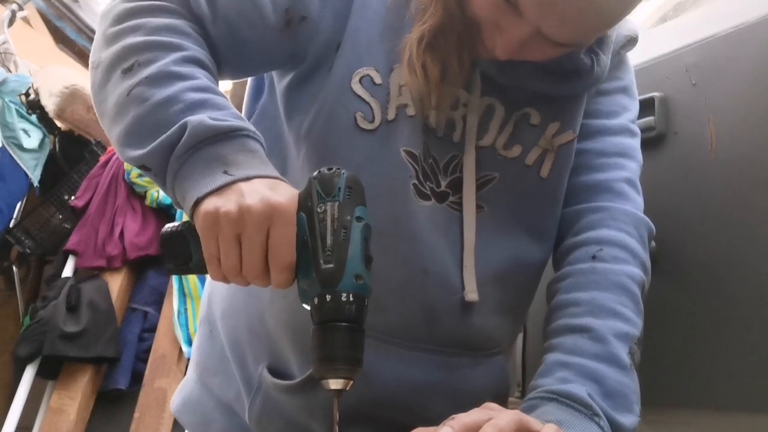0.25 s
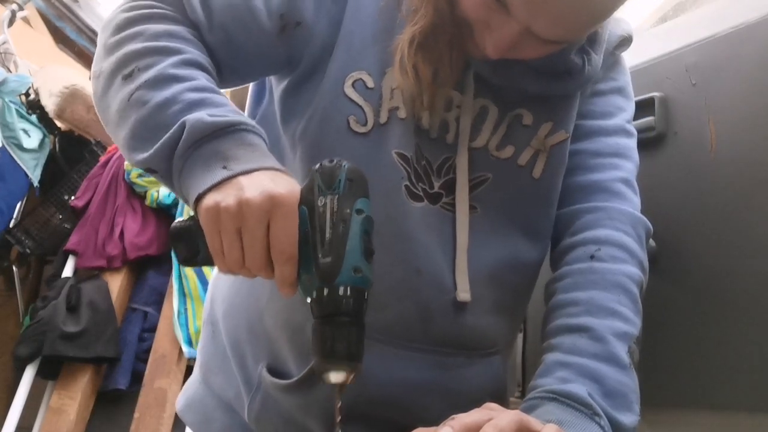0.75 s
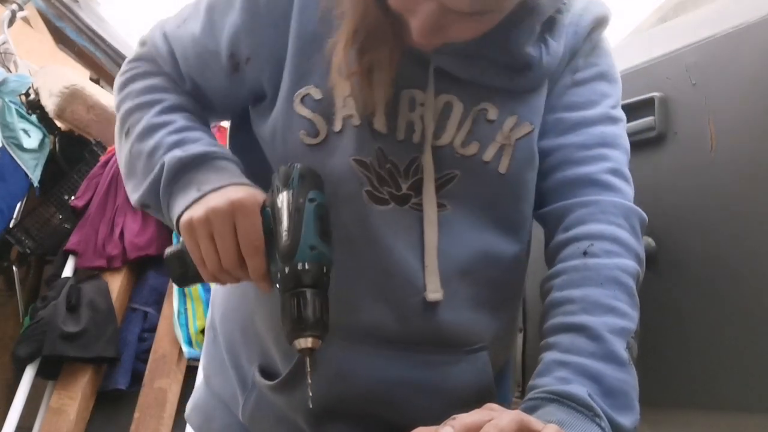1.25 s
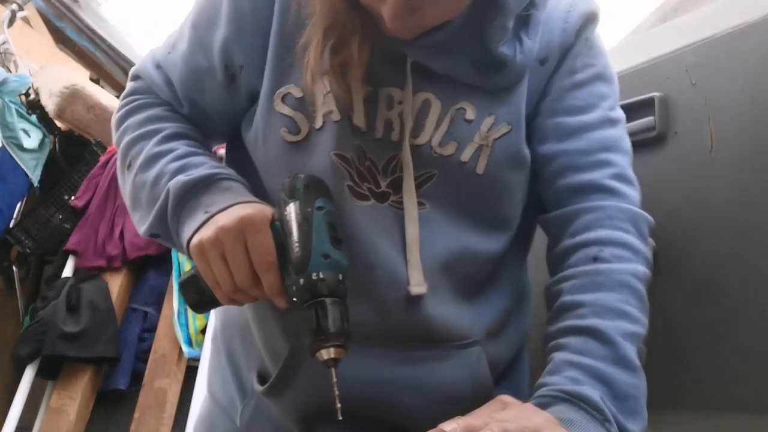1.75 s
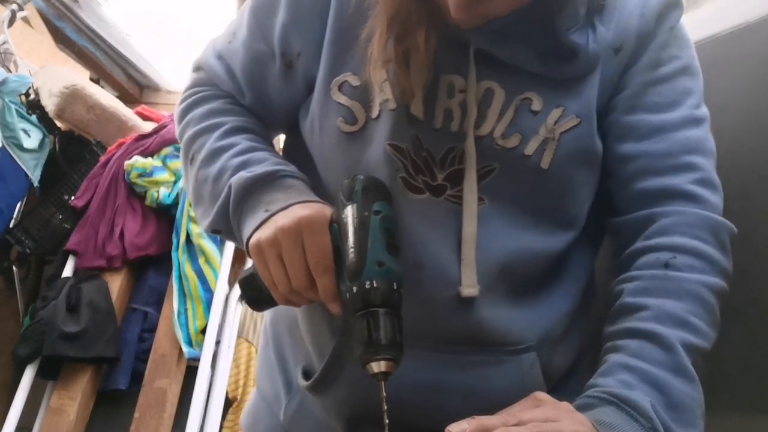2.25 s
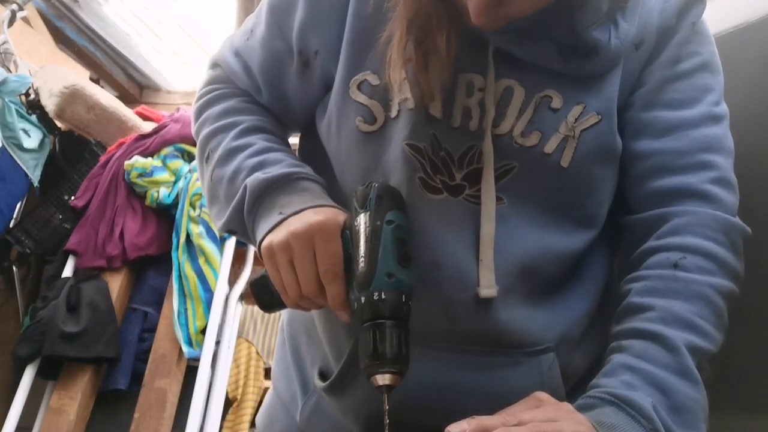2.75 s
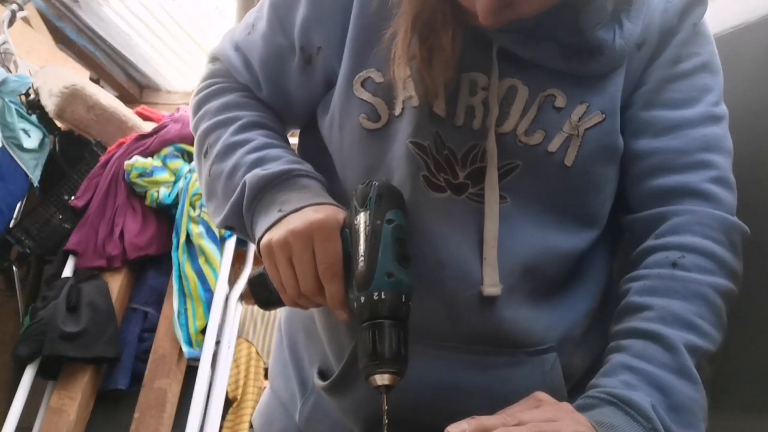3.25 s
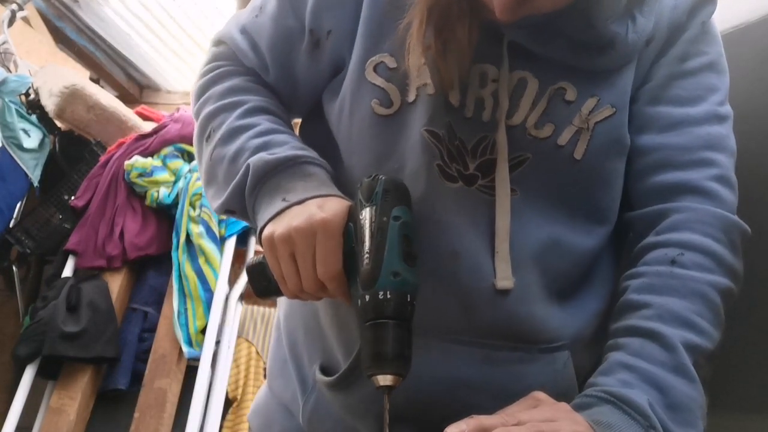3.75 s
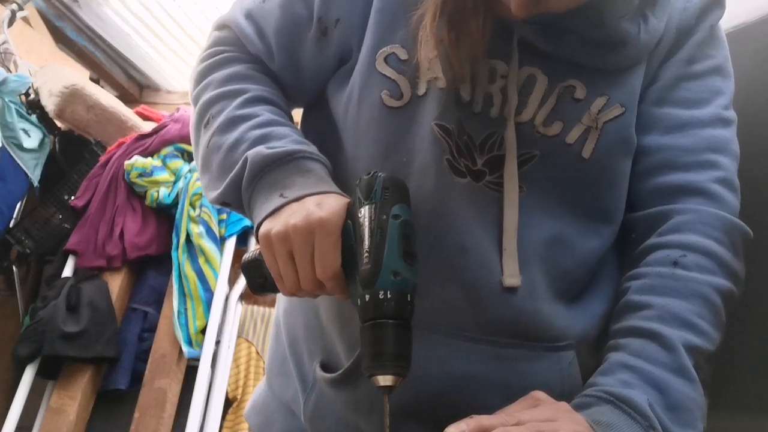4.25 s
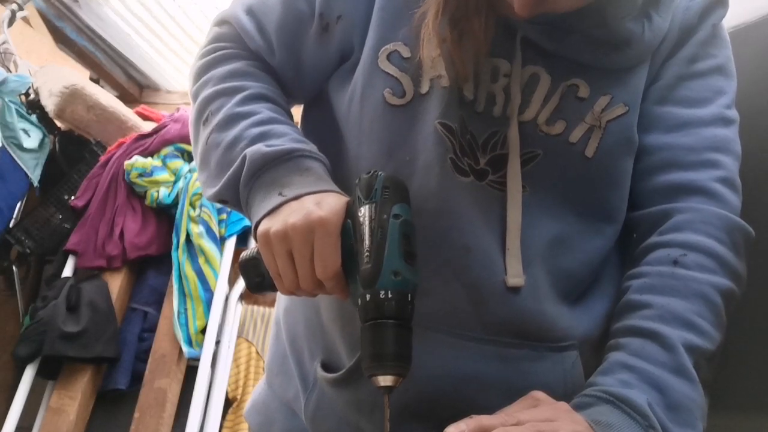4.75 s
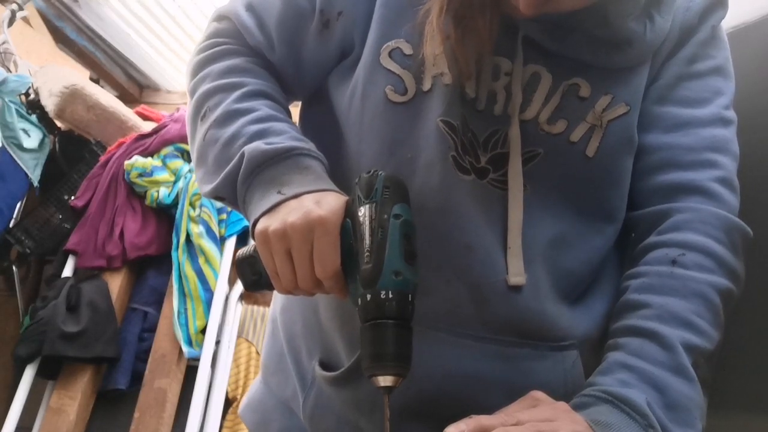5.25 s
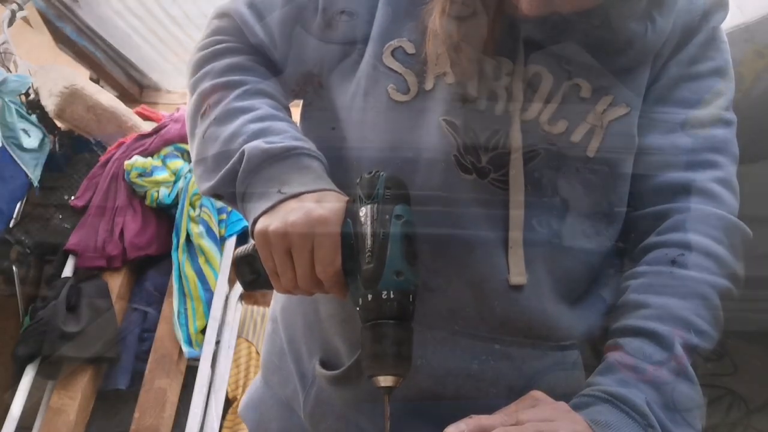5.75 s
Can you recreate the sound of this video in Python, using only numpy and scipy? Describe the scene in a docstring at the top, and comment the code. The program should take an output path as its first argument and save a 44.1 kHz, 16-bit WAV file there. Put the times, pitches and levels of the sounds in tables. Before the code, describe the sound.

Three short bursts of a cordless drill, a few taps, then steady drilling into sheet steel, chattering and squealing over a faint distant engine.

```python
"""A cordless drill is blipped three times in a hole in a steel panel, which rumbles under the bit.
It is lifted and set down with a few ticks. Then it bores the next hole: the motor whines, the bit
grabs and slips in a fast chatter, then cuts with a thin squeal. A distant engine drones outside the
garage throughout. All this is in the right channel; at the end a soft rush swells on both sides."""
import sys
import numpy as np
from scipy import signal
from scipy.io import wavfile

SR = 44100
rng = np.random.default_rng(int(sys.argv[2]) if len(sys.argv) > 2 else 0)


def log_audio(samples):
    """Write samples as a 16-bit WAV file to the path given in sys.argv[1]."""
    # one column per channel
    frames = np.atleast_2d(samples).T
    # limit to full scale, then quantise
    limited = np.clip(frames, -1, 1)
    pcm = np.round(limited * 32767).astype(np.int16)
    wavfile.write(sys.argv[1], SR, pcm)


N = 265482

# Short pulls of the trigger. Each row: press and release in seconds, top speed in turns per second,
# coasting time in seconds, fade in dB per second, relative levels of hiss, gear rattle and panel rumble
# in dB, and the second at which the bit leaves the rim.
BLIPS = [(0.037, .256, 297, 0.083, 750, -47, -46, -39, 0.24),
         (0.334, 0.566, 292, 0.086, 560, -47, -45, -34.5, 0.55),
         (0.668, 0.898, 305, .42, 400, -46, -47, -35.5, 0.81)]
# The motor sags as the bit digs in. Each row: time in seconds, top speed in turns per second.
BORE_SPEED = [(3.8, 277), (4.0, 277), (4.22, 285), (4.55, 274), (4.95, 264), (6.02, 266)]
# Gear whine while boring. Each row: time in seconds, relative level in dB.
BORE_WHINE = [(3.85, -70), (3.93, -58.5), (4.1, -49.5), (4.3, -48), (4.65, -55.5), (4.97, -54),
              (5.15, -62.5), (5.7, -62.5), (6.02, -69)]
# Tones of the cooling fan. Each row: multiple of the motor speed, relative level in dB.
FAN_TONES = [(14, -22), (21, -17), (28, -24)]
# How fast the bit chatters. Each row: time in seconds, slips per second.
CHATTER_RATE = [(3.9, 279), (4.0, 287), (4.85, 290), (5.03, 277), (5.5, 281)]
# Tones of the chatter. Each row: multiple of the chatter rate, relative level in dB.
CHATTER_TONES = [(2, -1), (4.05, -7), (5, -5), (6, -2.5), (7, -4.5), (8.3, -14), (10, -14.5)]
# Thin squeals and high motor overtones.
# Each row: start and end in seconds, pitch and width in Hz, relative level in dB.
SQUEALS = [(.108, .135, 14100, 900, -47), (.195, 0.21, 14800, 1200, -48), (0.498, 0.549, 14500, 1400, -48),
           (4.25, 4.54, 8260, 44.7, -55.5), (4.62, 4.9, 4890, 50, -57), (4.876, 5.158, 4890, 35.7, -51),
           (4.653, 4.88, 7540, 109.9, -54.5), (4.7, 5.4, 5240, 50, -60), (5.1, 5.583, 7490, 90, -55.5),
           (5.118, 5.55, 7700, 80, -65), (5.15, 5.51, 2910, 49.9, -58.5), (5.15, 5.495, 2387, 70, -57),
           (5.479, 6.1, 4874, 45, -56.5)]
# Short knocks and clicks: trigger releases, taps on the steel, snapping chips.
# Each row: start in seconds, relative level in dB, brightness in Hz, seconds to fade by 60 dB.
KNOCKS = [(0.259, -53, 7000, 0.019), (0.442, -33, 403, 0.019), (0.501, -37, 900, 0.028),
          (.598, -45, 3700, 0.056), (.678, -52, 2496, 0.057), (0.888, -39.5, 5400, 0.072),
          (1.4226, -68.5, 5900, 0.1), (1.621, -50.5, 1710, 0.055), (2.0077, -56.5, 6100, 0.075),
          (2.163, -51.5, 6170, 0.078), (2.168, -49, 5570, 0.064), (2.202, -53.5, 2710, 0.095),
          (2.499, -65, 4985, 0.038), (3.1556, -67, 4020, 0.042), (3.823, -49, 1600, 0.18),
          (5.071, -42, 12050, 0.073), (5.41, -44.5, 13120, 0.093), (5.665, -42.5, 12060, 0.086)]
# The distant engine. Each row: time in seconds, pitch in Hz, relative level in dB.
ENGINE = [(0.0, 86.4, -49), (0.1, 80, -61), (0.22, 90.5, -53), (0.3, 81.7, -59), (0.55, 66.6, -56),
          (0.74, 67, -59), (0.82, 74.9, -52.5), (1.05, 75.2, -52), (1.26, 66.2, -50), (1.34, 63.6, -63),
          (1.59, 61.0, -52), (1.96, 59.6, -63), (2.08, 55.8, -61.5), (2.45, 55.9, -49), (3.84, 55.6, -59.5),
          (3.96, 66.9, -70), (4.14, 72.43, -54.5), (4.32, 72.4, -55), (4.41, 67.6, -66),
          (4.61, 68.1, -50.5), (4.81, 68.04, -63), (4.86, 66.66, -54), (5.25, 67.0, -46),
          (5.5, 68.2, -59.5), (5.89, 66.4, -53), (6.02, 55.8, -55)]

# The pitches at which things ring. Each row: pitch in Hz, width in Hz, relative level in dB.
BIT_MODES = [(2912, 92, 0), (4000, 180, -1), (4950, 77, 2), (5200, 99, 1.5), (5650, 85, -1.5),
             (6600, 170, -2), (7230, 140, -8), (8490, 130, -1.5), (12560, 200, -24)]   # bit and chuck under the cut
CHATTER_MODES = [(607, 9, 3), (770, 42, -23), (1230, 73, -3), (1360, 130, -11), (1734, 320, -3),
                 (1966, 76, -4)]   # rung by the scrapes of the chatter
PANEL_MODES = [(326, 25, -0.5), (540.4, 21, 2), (846, 56, -3.5)]   # the steel sheet
HOUSING_MODES = [(254, 67, 10.5), (970, 730, 6), (1410, 340, 7.5), (2750, 320, 7), (3170, 210, -1),
                 (8600, 170, -27.5), (15300, 430, -14)]   # chuck and housing when knocked

# The colour of each noise, from low to high. Each row: frequency in Hz, relative strength there in dB.
HISS_COLOUR = [(500, -16), (700, -4.5), (980, -8), (1250, -4.5), (1750, -0.5), (2400, -4.5), (3300, -8.5),
               (3900, -6), (5200, -8), (6600, -8.5), (8800, -7.5), (9700, -15), (12000, -12), (15500, -11)]   # brushes, fan and chips
RATTLE_COLOUR = [(450, -19), (560, -6), (830, -3), (1100, 0), (1500, -3.5), (2100, -1), (2800, -12),
                 (4500, -9), (7000, -20.5)]   # gears and loose bit
RIM_RUMBLE_COLOUR = [(60, -6), (150, -2.5), (190, -4.5), (240, 2), (310, 2), (400, -1), (470, -18),
                     (700, -11.5), (1200, -17.5)]   # the panel during the blips
BORE_RUMBLE_COLOUR = [(70, -2), (150, 6.5), (200, -6), (300, 5), (460, -12), (700, -4), (1100, -1),
                      (2000, -34)]   # the panel while boring
RUSH_COLOUR = [(25, -6), (60, 1.5), (115, -13), (180, -7.5), (300, -17), (550, -22.5), (850, -17.5),
               (2000, -24), (4500, -30), (8000, -38), (15000, -51)]   # the closing rush
AIR_COLOUR = [(100, -27.5), (280, -24.5), (380, -31.5), (650, -29.5), (1200, -28.5), (1900, -32),
              (2500, -37), (4700, -38), (5600, -48.5), (7500, -51), (8700, -47.5), (10000, -57),
              (15800, -61)]   # still air in the garage
OUTSIDE_COLOUR = [(26, -2), (40, 8), (60, 0.5), (85, -4.5), (110, -36)]   # low rumble from outside
LEFT_NOISE_COLOUR = [(25, -2), (60, 1.5), (150, -5), (300, -10), (650, -12), (1100, -18.5), (2200, -19.5),
                     (3500, -25), (5200, -27), (6500, -36), (8300, -40), (10800, -25.5), (13000, -27),
                     (15500, -34)]   # faint noise in the left channel

SPIN_UP_S, HISS_LAG_S = 0.068, 0.023   # the motor gathers speed, and only then does the hiss come
RATTLE_ATTACK_S, RUMBLE_ATTACK_S = 0.022, 0.045
BORE_START_S, BORE_FADE_S = 3.794, 5.55   # the trigger is pressed; the drill's sound starts to fade
CHATTER_START_S, CHATTER_END_S = 3.912, 5.03   # the bit skates
BITE_START_S, BITE_END_S = 4.92, 5.65   # the bit bites and shakes the panel
CUTOFF_HZ = 15800


def drill():
    """Three blips and one long bore. Returns the drill's noises and its tones separately."""
    speed = motor_speed()
    blipping, rattling, reaming, blip_hum, blip_whine = blip_gains()
    first_press, last_release = BLIPS[0][0], BLIPS[-1][1]
    # a faint whirr carries on between the blips
    coasting = from_db(-70.5) * envelope(first_press, last_release, attack_s=0.017, fall_db_per_s=299)
    bore = from_db(-44.5) * envelope(BORE_START_S + HISS_LAG_S, BORE_FADE_S, 0.045, fall_db_per_s=13)
    bite = envelope(BITE_START_S, BITE_END_S, attack_s=0.073, fall_db_per_s=86)
    running = blipping + coasting + bore
    boring = from_db(-17.5) * bore + from_db(-58) * bite
    hum = blip_hum + from_db(-33) * bore + from_db(-57.5) * bite
    whine = blip_whine + from_db(curve(BORE_WHINE, outside=-np.inf))
    # the gears also rattle as the bore starts, until the bit takes the load
    rattling += from_db(-54.5) * envelope(BORE_START_S, CHATTER_START_S, RATTLE_ATTACK_S, 200)
    noises = hiss(speed, running) + rattling * gear_rattle() + panel(reaming, boring)
    noises += squeals() + knocks() + tip_slide()
    return noises, motor(speed, running, hum, whine) + chatter(speed, bore)


def motor_speed():
    """Turns per second: each pull of the trigger spins the motor up; let go, it coasts down."""
    pulls = [top * rise(press, SPIN_UP_S) * np.exp(-since(release) / coast_s)
             for press, release, top, coast_s, *_ in BLIPS]
    bore = curve(BORE_SPEED) * rise(BORE_START_S, SPIN_UP_S)
    return np.max(pulls + [bore], axis=0)


def blip_gains():
    """How strong the hiss, gear rattle, panel rumble, hum and whine are over the three blips."""
    gains = np.zeros((5, N))
    for press, release, _, _, fade, hiss_db, rattle_db, rumble_db, leaves_rim in BLIPS:
        gains += [from_db(hiss_db) * envelope(press + HISS_LAG_S, release, 0.014, fade),
                  from_db(rattle_db) * envelope(press, release, RATTLE_ATTACK_S, fade),
                  from_db(rumble_db) * envelope(press, leaves_rim, RUMBLE_ATTACK_S, fall_db_per_s=222),
                  from_db(-51.5) * envelope(press, release, RUMBLE_ATTACK_S, fall_db_per_s=153),
                  from_db(-57) * envelope(press, release, RUMBLE_ATTACK_S, fade)]
    return gains


def motor(speed, running, hum_gain, whine_gain):
    """The off-balance motor hums once a turn, the gears whine at three a turn, the fan sings faintly."""
    turn = angle(speed * (1 + 0.00172 * drift(17.5)))
    hum = hum_gain * from_db(1.8 * drift(25)) * np.sin(turn + 0.45 * drift(30))
    third, ninth = np.sin(3 * turn), np.sin(9 * turn)
    whine = whine_gain * from_db(1.7 * drift(20)) * third
    fan = sum(from_db(db + 2 * drift(12)) * np.sin(multiple * turn) for multiple, db in FAN_TONES)
    # as the speed changes, overtones sweep through the pitches at which the housing rings
    squeak = resonance(resonance(ninth, hz=1930, width=95), hz=1930, width=95)
    lower_squeak = resonance(resonance(ninth, hz=1640, width=110), hz=1620, width=110)
    hoot = resonance(third, hz=633, width=26)
    housing = from_db(13.5) * squeak + from_db(6.5) * lower_squeak + from_db(2) * hoot
    return np.sqrt(2) * (hum + whine) + running * (housing + fan)


def hiss(speed, running):
    """Brushes, fan and breaking chips make a dense crackle that throbs with each turn; the bit rings."""
    throb = (1 + 0.073 * np.sin(angle(speed))) * from_db(0.64 * drift(40))
    crackle = np.array([grains(per_s=16000, spread_db=1) for _ in range(2)]) * throb
    rush = from_db(1) * coloured(HISS_COLOUR, flicker_db=1.35, sources=crackle, per_octave=5)
    ringing = from_db(-6.5) * body(grains(per_s=5000, spread_db=5), BIT_MODES)
    return running * (rush + ringing)


def gear_rattle():
    """The gears and the loose bit clatter while the drill runs without load."""
    clatter = [grains(per_s=3000, spread_db=2) for _ in range(2)]
    return from_db(2) * coloured(RATTLE_COLOUR, flicker_db=1.5, sources=clatter)


def chatter(speed, bore):
    """The bit's edges grab and slip very fast; the rate sways as each of the two edges comes round."""
    gear_ratio, edges = 41, 2
    sway = 0.013 * np.sin(edges * angle(speed / gear_ratio)) + 0.004 * drift(12)
    slip = angle(curve(CHATTER_RATE) * (1 + sway)) + 0.014 * drift(105)
    tones = sum(from_db(db + 2 * drift(38)) * np.sin(multiple * slip + rng.uniform(0, 2 * np.pi))
                for multiple, db in CHATTER_TONES)
    scrapes = rng.standard_normal(N) * np.exp(3.9 * np.cos(slip))   # one short scrape per slip
    push = from_db(-46.5 + 1.4 * drift(9.6))   # the hand's push varies
    skating = push * envelope(CHATTER_START_S, CHATTER_END_S, attack_s=0.028, fall_db_per_s=189)
    strength = skating + from_db(-13.5) * bore   # a little chatter lasts through the whole bore
    return strength * (rms_one(tones) + from_db(-5) * body(scrapes, CHATTER_MODES))


def panel(reaming, boring):
    """The bit's grooves bump round the hole's rim (reaming) or cut in (boring), shaking the sheet."""
    ringing = from_db(-7) * body(grains(per_s=550, spread_db=4), PANEL_MODES)
    bumps = [grains(per_s=1500, spread_db=5.5) for _ in range(2)]
    rim = ringing + from_db(-2) * coloured(RIM_RUMBLE_COLOUR, flicker_db=1.5, sources=bumps)
    return reaming * rim + boring * coloured(BORE_RUMBLE_COLOUR, flicker_db=0.5, sources=bumps)


def squeals():
    """Thin squeals and high motor overtones swell and fade; the more one wanders, the rougher it is."""
    out, seconds = np.zeros(N), since(0)
    for start, end, hz, width, db in SQUEALS:
        progress = np.clip((seconds - start) / (end - start), 0, 1)
        swell = np.sqrt(np.sin(np.pi * progress))
        wander = np.cumsum(rng.standard_normal(N)) * np.sqrt(np.pi * width / SR)
        tone = resonance(np.sin(2 * np.pi * hz * seconds + wander), hz, 2 * width)
        out += from_db(db) * swell * rms_one(tone)
    return out


def knocks():
    """Each knock or click is a short crack that also rings the chuck and housing."""
    out, size = np.zeros(N), SR // 5
    age = np.arange(size) / SR
    ringing = from_db(-3) * body(rng.standard_normal(N), HOUSING_MODES)
    for start, db, bright_hz, fade_s in KNOCKS:
        span = slice(round(start * SR), round(start * SR) + size)
        crack = rms_one(resonance(rng.standard_normal(size), bright_hz, width=0.54 * bright_hz))
        out[span] += (crack + ringing[span]) * from_db(db - 60 * age / fade_s)
    return out


def tip_slide():
    """The tip scratches faintly over the steel to its mark."""
    scratch = rms_one(resonance(grains(per_s=3100, spread_db=-4), hz=5880, width=5700))
    return from_db(-70) * envelope(start=1.838, end=2.22, attack_s=0.059, fall_db_per_s=600) * scratch


def garage_echo(sound, fade_s, echo_db):
    """Ten repeating echoes with unrelated delays make a small, cluttered room."""
    echoes = np.zeros(N)
    for k, lag in enumerate((rng.uniform(0.008, 0.035, 10) * SR).astype(int)):
        loop, gain = sound.copy(), from_db(-60 * lag / SR / fade_s)
        for i in range(lag, N, lag):
            loop[i:i + lag] += gain * loop[i - lag:i][:N - i]
        echoes += (-1) ** k * (loop - sound)
    return sound + from_db(echo_db) * echoes


def closing_rush():
    """A soft, deep rush swells on both sides, a little louder on the left."""
    swell = from_db(-46) * rise(start=5.68, attack_s=0.032)
    return np.array([from_db(db) * swell * coloured(RUSH_COLOUR, flicker_db=1.5) for db in (0, -2)])


def distant_engine():
    """An engine drones far away: one low tone that wavers in pitch and level."""
    drone = np.sqrt(2) * np.sin(angle(curve(ENGINE, column=1)) + 0.28 * drift(21))
    waver = from_db(drift(32) - 0.5)
    return from_db(0.66 + curve(ENGINE, column=2)) * waver * drone


def room_noise():
    """Still air in the garage, with a low rumble from outside."""
    air = from_db(-63) * coloured(AIR_COLOUR, flicker_db=0, per_octave=4)
    return air + from_db(-60) * coloured(OUTSIDE_COLOUR, flicker_db=1.5)


def from_db(db):
    """Turn decibels into a number to multiply by."""
    return 10 ** (np.asarray(db) / 20)


def rms_one(x):
    """Scale a signal so that its average strength (rms) is 1."""
    return x / np.sqrt(np.mean(x ** 2) + 1e-20)


def since(start):
    """Seconds since a moment; zero before it."""
    return np.maximum(np.arange(N) / SR - start, 0)


def rise(start, attack_s):
    """Climb from 0 towards 1, quickly at first and then more slowly."""
    return 1 - np.exp(-since(start) / attack_s)


def envelope(start, end, attack_s, fall_db_per_s):
    """Rise from the start in an S-curve, hold, and die away after the end."""
    return rise(start, attack_s) ** 2 * from_db(-fall_db_per_s * since(end))


def curve(rows, column=1, outside=None):
    """One column of a table, joined by straight lines in time."""
    rows = np.array(rows)
    return np.interp(since(0), rows[:, 0], rows[:, column], outside, outside)


def drift(hz):
    """A smooth random wobble, about 1 in size and mostly slower than hz."""
    r = np.exp(-80 * np.pi * hz / SR)
    noise = rng.standard_normal(N // 40 + 2002)   # one value for every 40 samples, plus a run-up
    slow = signal.lfilter([1], [1, -2 * r, r * r], noise)[2000:]
    return np.interp(np.arange(N) / 40, np.arange(len(slow)), rms_one(slow))


def angle(hz):
    """The angle reached so far by something that turns at this rate."""
    return 2 * np.pi * np.cumsum(hz) / SR


def resonance(x, hz, width):
    """Let a signal ring at one pitch; a narrower width rings longer."""
    r = np.exp(-np.pi * width / SR)
    feedback = [1, -2 * r * np.cos(2 * np.pi * hz / SR), r * r]
    return signal.lfilter(np.array([1, 0, -1]) * (1 - r * r) / 2, feedback, x + 1e-18)


def body(x, modes):
    """Let a signal ring an object at several pitches, added with alternating signs."""
    rings = [from_db(db) * resonance(x, hz, width) for hz, width, db in modes]
    return rms_one(sum((-1) ** k * ring for k, ring in enumerate(rings)))


def grains(per_s, spread_db):
    """Tiny contacts of uneven strength at random moments."""
    sizes = from_db(spread_db * np.minimum(rng.exponential(1, N), 4)) * rng.choice([-1, 1], N)
    return rms_one(sizes * (rng.random(N) < per_s / SR))


def coloured(colour, flicker_db, sources=None, per_octave=3):
    """Shape noise band by band. Two sources take turns feeding the bands, and each band can flicker."""
    sources = rng.standard_normal((2, N)) if sources is None else sources
    hz, db = np.transpose(colour)
    edges = 16000 / 2 ** (np.arange(9 * per_octave + 2)[::-1] / per_octave)
    out = np.zeros(N)
    for k, (low, high) in enumerate(zip(edges, edges[1:])):
        if high > hz[0] and low < hz[-1]:
            band_filter = signal.butter(2, [low, high], "band", fs=SR, output="sos")
            band_db = np.interp(np.log(low * high) / 2, np.log(hz), db)
            flicker = flicker_db * drift(21) if flicker_db else 0
            out += signal.sosfilt(band_filter, sources[k % 2]) * from_db(band_db + flicker)
    return rms_one(out)


def scene():
    """Drill, garage and engine are on the right; the left has only faint noise until the closing rush."""
    noises, tones = drill()
    echoing = garage_echo(noises, fade_s=0.15, echo_db=-16)
    right = from_db(5) * (echoing + tones + room_noise() + distant_engine())
    left = from_db(-80) * coloured(LEFT_NOISE_COLOUR, flicker_db=-0.5)
    return np.array([left, right]) + closing_rush()


def record(dry):
    """Cut off the very highest treble steeply."""
    return signal.sosfilt(signal.ellip(12, 0.1, 80, CUTOFF_HZ, fs=SR, output="sos"), dry)


dry = scene()
out = record(dry)
log_audio(out)
```